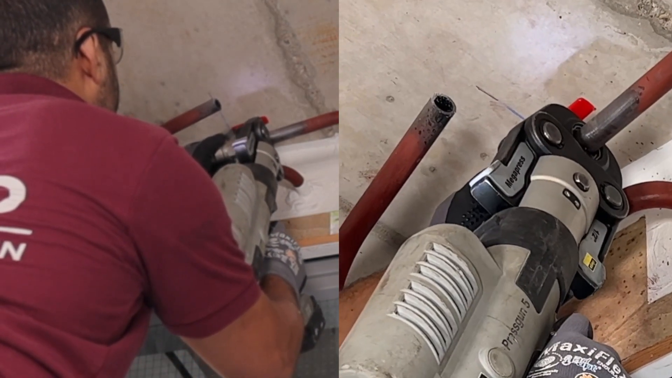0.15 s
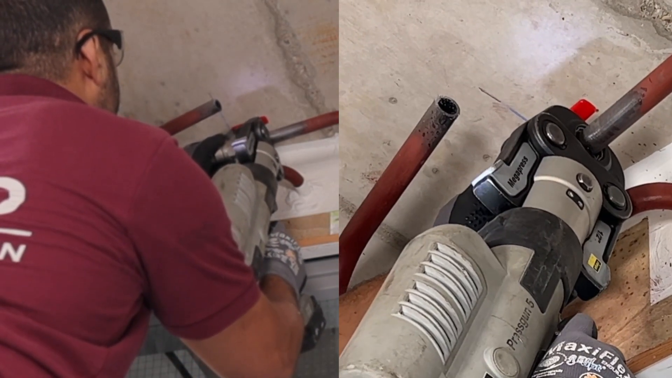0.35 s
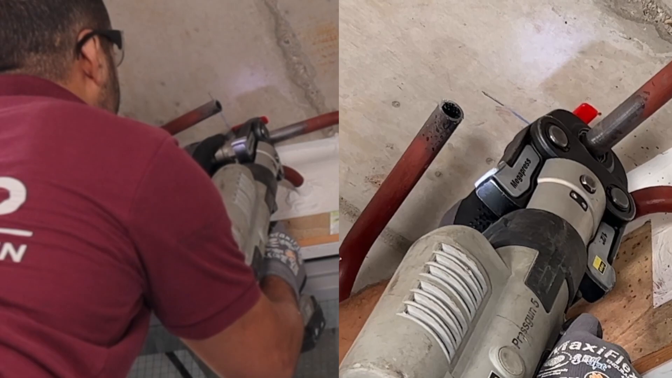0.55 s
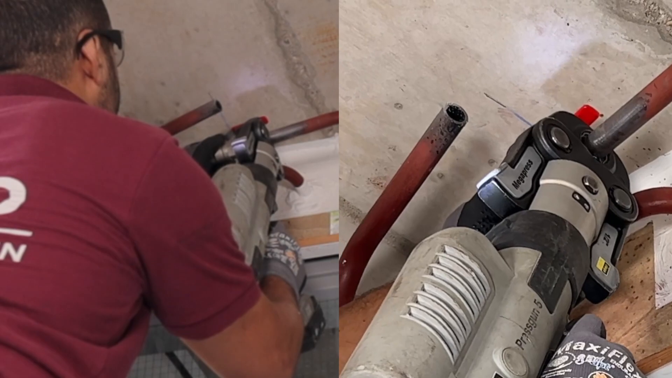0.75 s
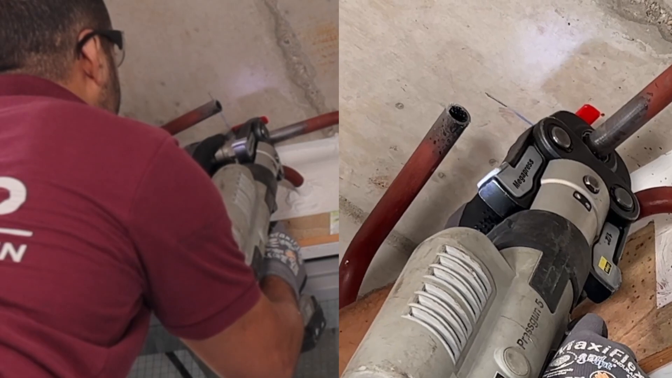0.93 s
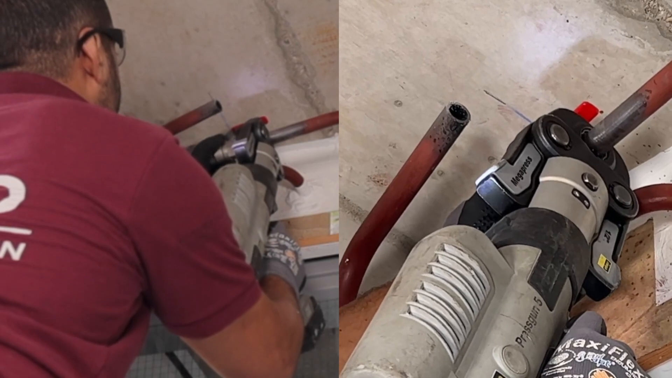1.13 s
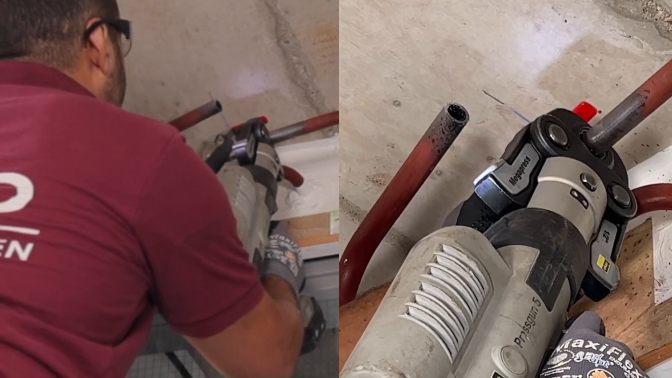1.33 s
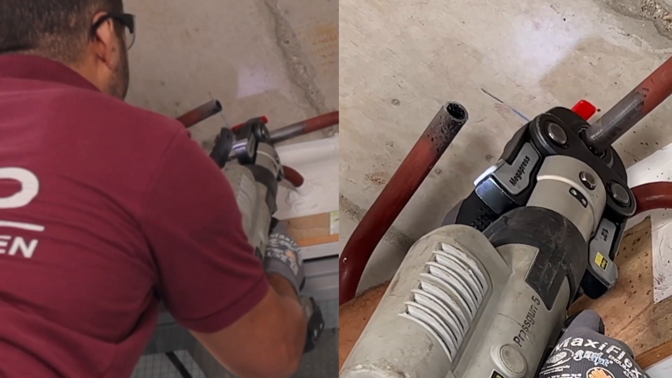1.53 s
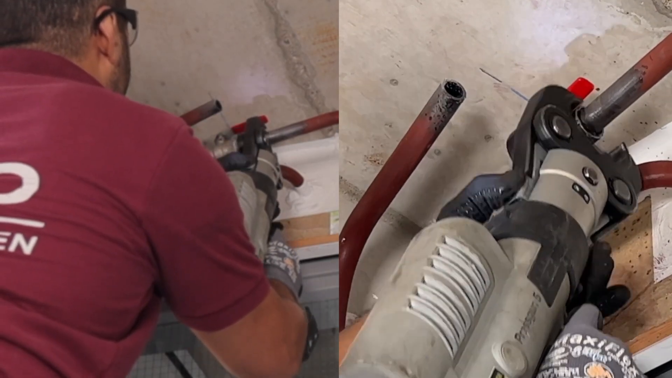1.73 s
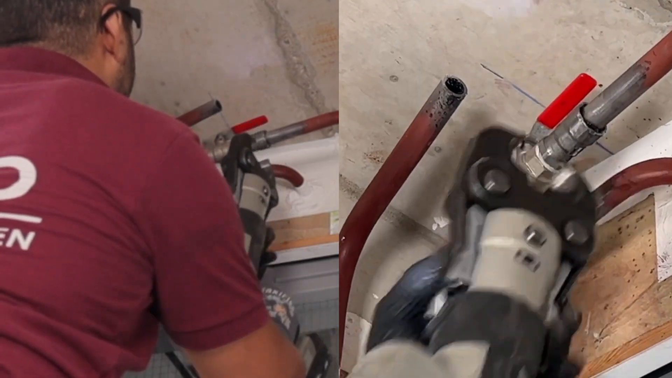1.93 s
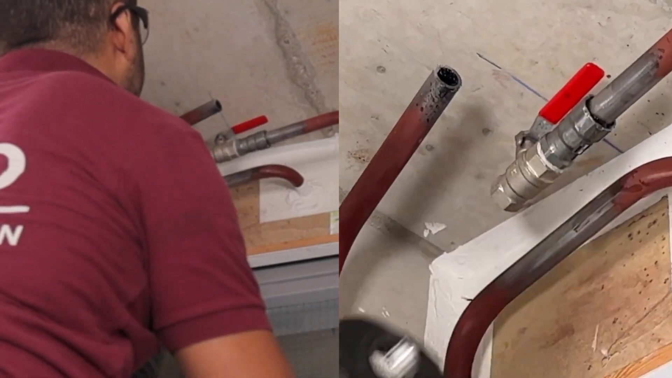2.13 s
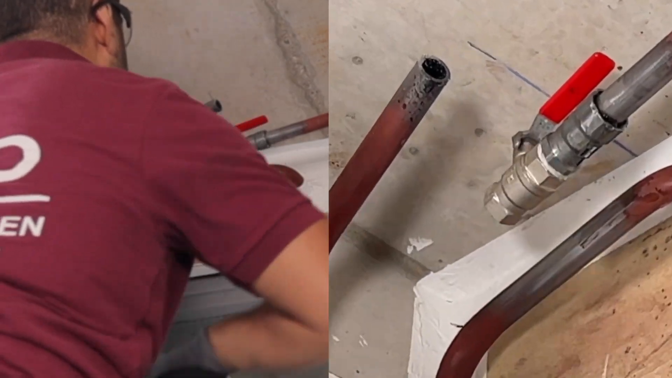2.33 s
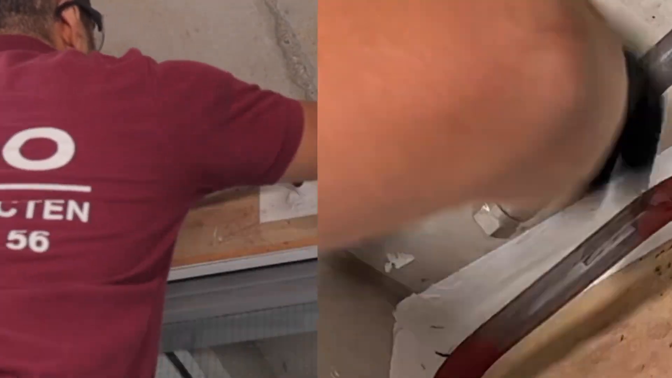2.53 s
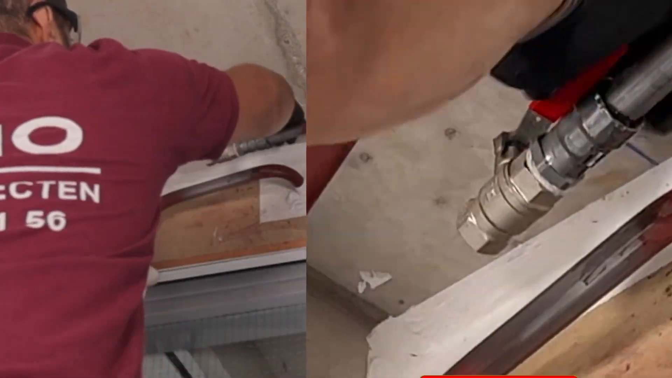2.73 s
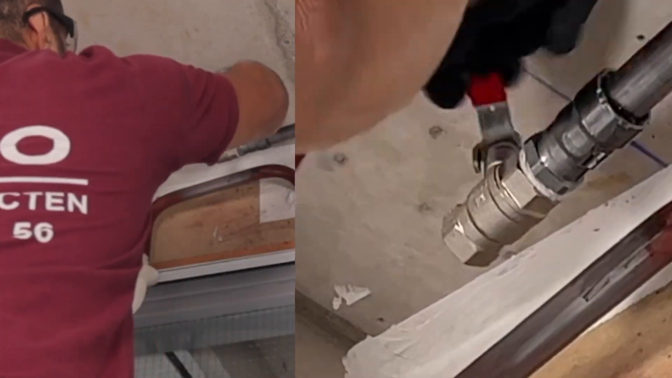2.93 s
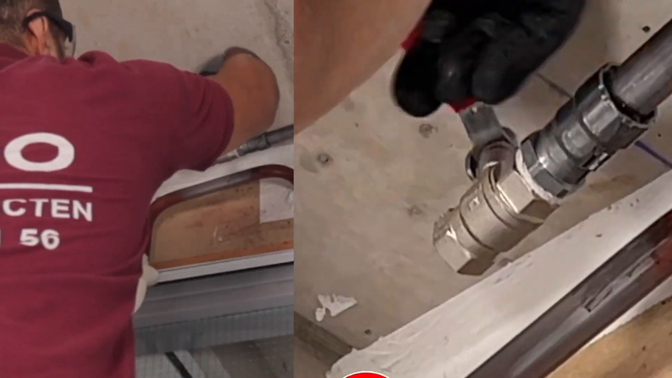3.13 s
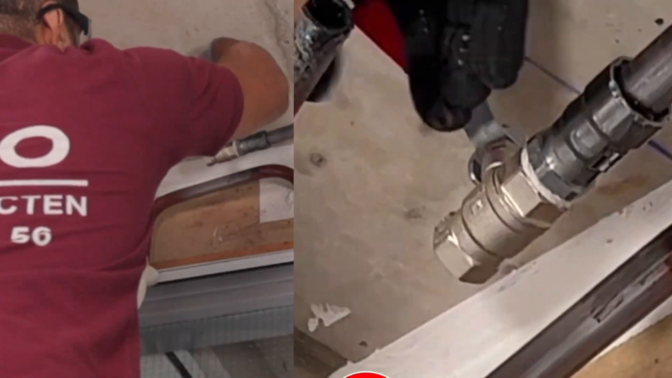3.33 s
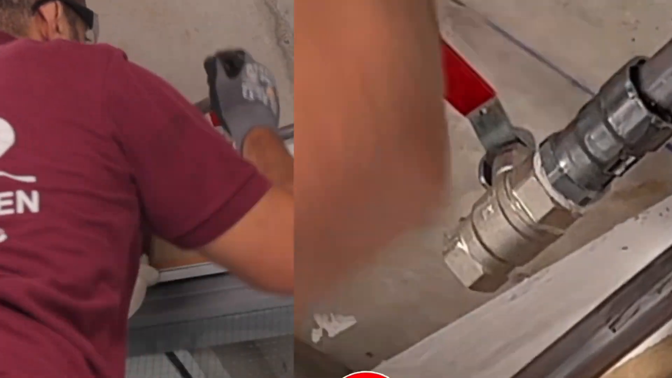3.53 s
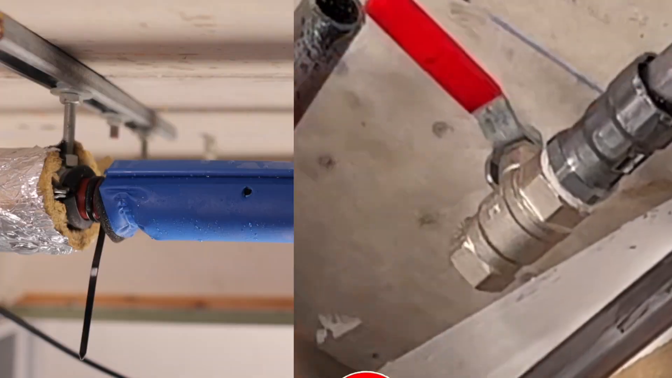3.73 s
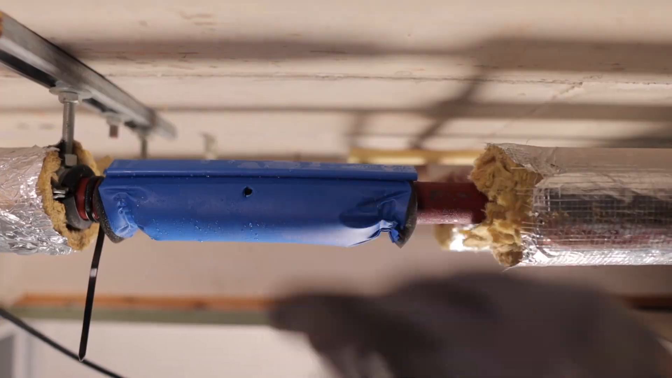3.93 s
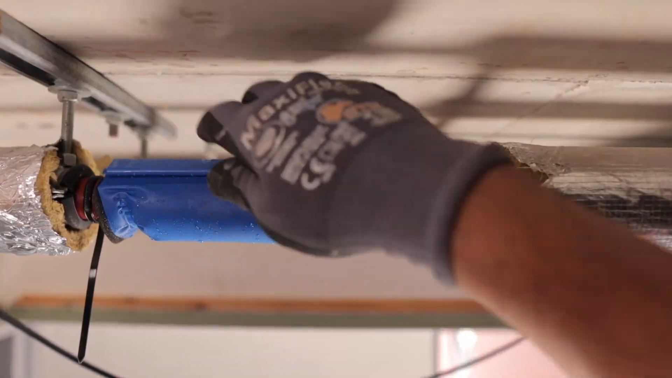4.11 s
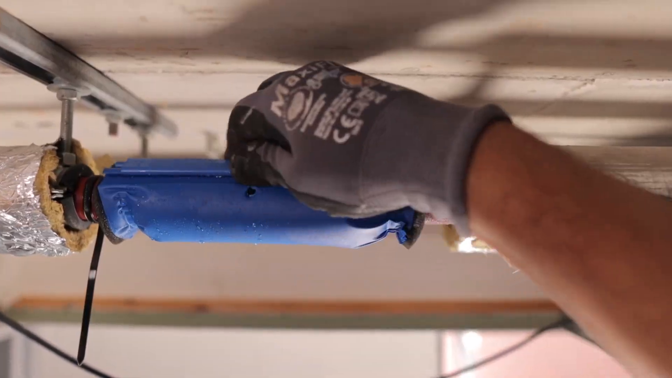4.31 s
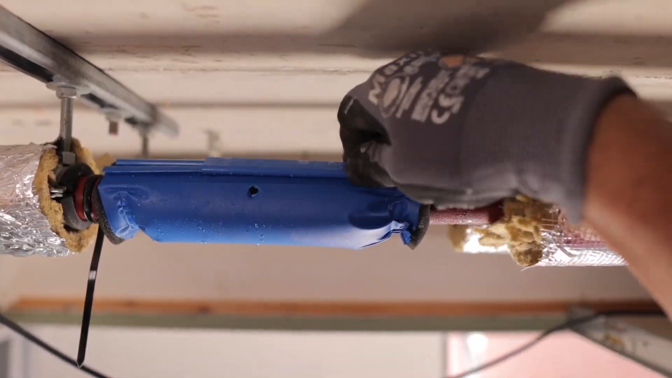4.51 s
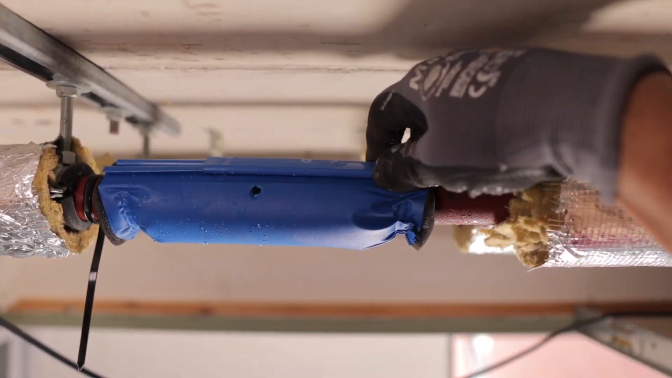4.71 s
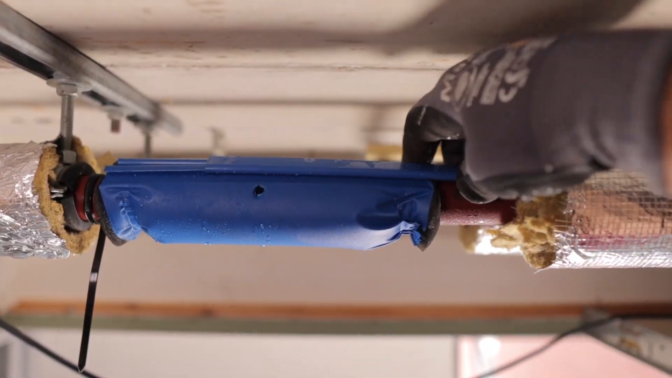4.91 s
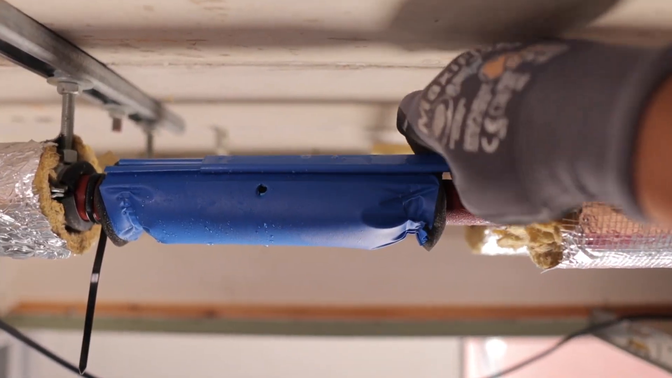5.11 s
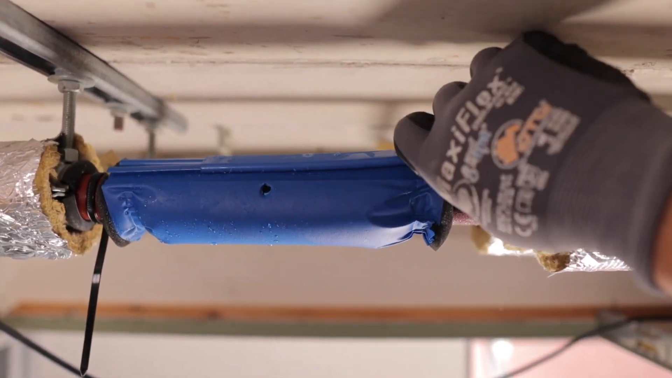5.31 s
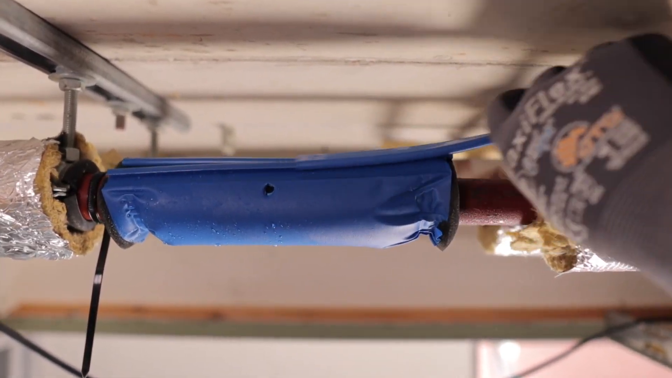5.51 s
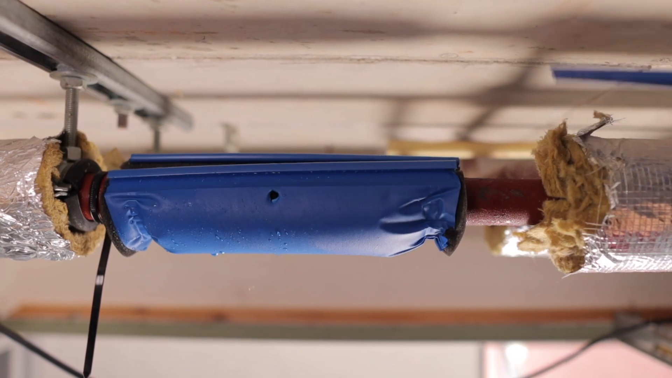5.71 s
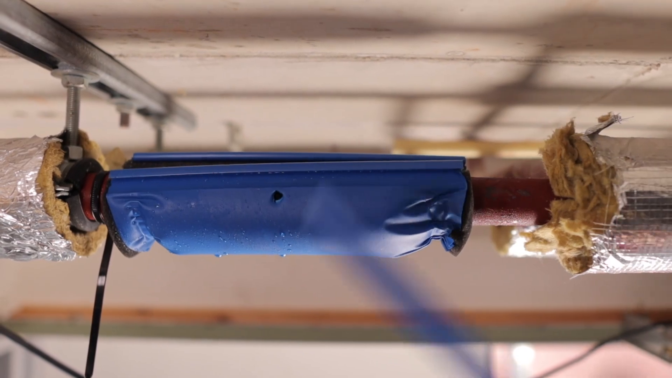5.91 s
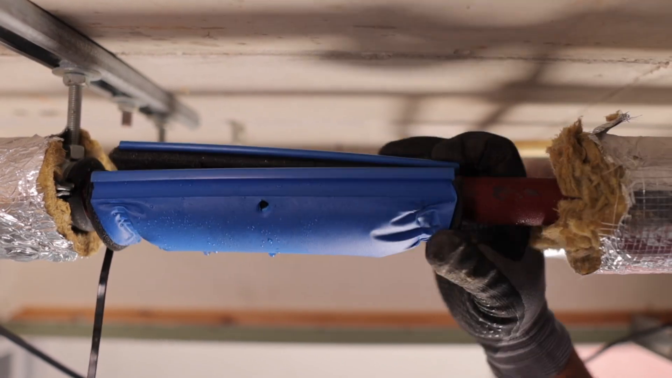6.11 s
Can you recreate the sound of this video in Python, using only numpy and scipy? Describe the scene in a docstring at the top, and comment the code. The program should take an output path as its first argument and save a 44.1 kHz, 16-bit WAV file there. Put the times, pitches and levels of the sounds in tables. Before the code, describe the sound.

A battery press tool whines and hammers rapidly, sagging under load, pops and stops; metal jaws clank, a valve scrapes, then plastic ticks and rasps quietly.

```python
"""A piston pump knocks and whines as a battery press tool crimps a fitting on a steel pipe, slowing under load.
The relief valve pops; sprung steel jaws snap open and clank shut in a bare room; a glove turns a ball valve.
In a second scene, a near microphone (right) and a distant one (left) hear a glove pull a plastic strip along
a pipe sleeve. Damped modes give the ringing, filtered noise the friction, and phase-locked sines the gears."""
import sys
import numpy as np
from scipy import signal
from scipy.fft import rfft, irfft
from scipy.io import wavfile

SR = 44100
rng = np.random.default_rng(int(sys.argv[2]) if len(sys.argv) > 2 else 0)


def to_wav(s):
    """Save 16-bit WAV."""
    ch = np.atleast_2d(s).T  # columns
    pcm = np.round(np.clip(ch, -1, 1) * 32767)  # PCM
    wavfile.write(sys.argv[1], SR, pcm.astype(np.int16))


N = 271656
T = np.arange(N) / SR

# Pump speed under load, then free running and braking: [t/s, stroke rate f/Hz]
LOADED_SPEED = [(0.0, 63.15), (0.206, 64.18), (0.334, 63.75), (0.598, 61.82), (0.714, 60.1), (0.826, 56.81),
                (0.906, 55.1), (0.996, 52.2), (1.02, 52.4)]
FREE_SPEED = [(1.045, 56.5), (1.092, 65), (1.11, 57), (1.18, 20)]
# Resonances of the tool's shell: [f/Hz, width/Hz, level/dB]
SHELL_MODES = [(727, 29, -0.5), (1062, 59, 7), (1940, 240, -10), (2276, 110, 1), (2565, 7, 4),
               (2940, 110, -0.5), (3720, 54, -7), (5400, 400, 0.5)]
# The shell's response to the overtones of cam and gears: [f/Hz, level/dB]
SHELL_RESPONSE = [(64, -22), (128, -35), (192, -35.5), (260, -16), (380, -20.5), (450, -17.5), (510, -19.5),
                  (580, -5), (700, -5), (765, 1), (830, -24.5), (900, -22.5), (960, -4.5), (1085, -3),
                  (1160, -21), (1470, -11.5), (1720, -11.5), (1990, 0.5), (2110, -8), (2230, -4.5),
                  (2400, -20.5), (2600, -2), (2750, -19)]
# A narrow gearbox resonance: [f/Hz, width/Hz]
GEARBOX_RESONANCE = (3700, 70)
# The two strong gearbox overtones: [multiple of the stroke rate]
STRONG_ORDERS = (59, 60)
# Relative noise spectra of gears, piston knock and returning oil: [f/Hz, level/dB per Hz]
GEAR_SPECTRUM = [(59, -56.5), (100, -38.5), (277, -26.5), (308, -15), (350, -22.5), (433, -7.5),
                 (752, -1.5), (872, -12), (1060, -5.5), (1280, -9), (2000, -13.5), (4670, -8), (5650, -7),
                 (12400, -23), (16000, -39.5)]
PISTON_SPECTRUM = [(100, -56.5), (200, -32), (280, -14), (460, -3.5), (600, -12), (760, 1), (900, -10.5),
                   (1080, -3.5), (1300, -6.5), (1900, 1), (3000, -4.5), (4300, -15), (6000, -17),
                   (8000, -25.5), (12700, -28.5), (16000, -35)]
OIL_SPECTRUM = [(88, -57.5), (150, -34.5), (475, -11), (649, -13), (730, 5.5), (923, -9), (1830, -6),
                (3200, -11.5), (4490, -17), (5570, -16.5), (12400, -30), (16000, -45)]
# Components of the relief valve's pop: [f/Hz, level/dB, t60/s]
RELIEF_MODES = [(450, -4, 0.15), (1440, -3, 0.033)]
# Modes of the steel jaws: [f/Hz, relative level/dB snapped open, relative level/dB clanking shut, t60/s]
STEEL_MODES = [(720, -6, -28.5, 0.024), (3300, -13.5, -20.5, 0.015), (5000, -9, -18, .015),
               (6060, 3.5, -11.5, 0.018), (6640, -16, -11, .025), (6850, -8.5, -23.5, 0.028),
               (8270, -20, 2.5, 0.042), (12900, -9, -25, 0.02), (13900, -15, 4, 0.076)]
# Blows on the jaws: [t/s, relative level/dB, closure 0-1, treble tilt/dB per octave, crack t60/s]
BLOWS = [(1.8619, -6.5, 0.1, 3.5, 0.064), (1.8631, -0.5, 0.08, -2, 0.019), (2.11, 3, 0.8, -4, 0.0078),
         (2.13, -1, 0.98, -2.5, 0.011), (2.1402, -15.5, 1, -9.5, 0.026), (2.145, -14.5, 0.2, 2.5, 0.078)]
# Relative spectra of jaw crack, pin rattle and dragged tool: [f/Hz, level/dB per Hz]
CRACK_SPECTRUM = [(59, -62.5), (100, -23.5), (736, -8.5), (2370, -0.5), (2930, -5), (3540, -3.5),
                  (5300, -7), (6290, -1.5), (9410, -13), (14100, -10), (16000, -21.5)]
RATTLE_SPECTRUM = [(100, -28), (400, -13), (800, -9.5), (1500, 6.5), (2800, -7.5), (3600, -2.5),
                   (6500, -5.5), (10000, -17.5), (16000, -20)]
DRAG_SPECTRUM = [(30, -16.5), (55, -11.5), (70, 2), (90, -12), (130, -20.5), (250, -34), (2000, -70.5)]
# Knocks of tool and valve handle: [t/s, peak level/dB, centre f/Hz, t60/s, width/octaves]
HANDLE_KNOCKS = [(1.311, -32, 679, 0.067, 0.46), (1.49, -25.5, 5050, 0.035, 0.35),
                 (1.812, -32.5, 693, 0.06, 1.3), (1.819, -20, 860, 0.12, 1.65),
                 (1.824, -25.5, 730, 0.035, 1.3), (1.885, -17.5, 1626, 0.11, 2.3),
                 (1.899, -16.5, 700, 0.11, 1.7), (2.091, -33, 875, 0.068, 1.13),
                 (2.34, -31, 900, 0.058, 1.76), (2.365, -31, 684, 0.087, 0.89),
                 (2.469, -26, 713, 0.083, 0.5)]
# Modes of the valve body and its pipe: [f/Hz, relative level/dB, t60/s]
BODY_MODES = [(130, 0, 0.1), (609, -3.5, 0.072), (737, 3, 0.051), (934, -1, 0.045), (1482, -0.5, 0.063),
              (1603, -3.5, 0.047), (1820, -6.5, 0.087), (2550, -7.5, 0.043)]
# Glove bumps on the valve handle: [t/s, relative level/dB, hold/s, release/s]
HANDLE_BUMPS = [(3.094, -35.5, .11, 0.24), (3.46, -40, .016, 0.068), (3.804, -44, 0.0072, .02)]
# Pushes that turn the ball in its seat: [t/s, relative starting level/dB, hold/s, release/s]
BALL_PUSHES = [(3.039, -44, 0.038, 0.34), (3.439, -49.5, .3, 0.048)]
# Relative spectra of gripping glove, scraping ball and rubbing strip: [f/Hz, level/dB per Hz]
GRIP_SPECTRUM = [(18, -25.5), (30, 7.5), (122, 5), (165, 1.5), (246, 1.5), (473, -1), (578, -22), (724, -1),
                 (863, -18), (1100, -11), (2000, -30), (12000, -42), (15600, -76.5), (22000, -120)]
SCRAPE_SPECTRUM = [(47, -35), (80, -9), (124, -10), (205, -16), (379, -7), (526, -10), (747, -10.5),
                   (1260, -15.5), (1790, -15.5), (2040, -19.5), (3310, -22.5), (5020, -25), (15000, -44)]
STRIP_SPECTRUM = [(88, -83), (150, -12), (286, -13.5), (475, 2), (524, -8.5), (612, 0.5), (960, -5),
                  (1080, -2.5), (1700, -2), (2800, -11), (6200, -12), (8500, -24), (12700, -23),
                  (16000, -29)]
# Tugs on the strip, where friction builds up and lets go: [peak t/s, relative level/dB, build-up/s]
STRIP_TUGS = [(4.161, -42.5, 0.0084), (4.275, -44.5, 0.031), (4.44, -49.5, 0.32), (4.591, -47.5, 0.11),
              (4.95, -49, 0.043), (5.015, -46, .05), (5.07, -49, 0.022), (5.185, -38, 0.019),
              (5.348, -33.5, 0.024), (5.669, -45.5, .09), (5.745, -35, 0.084), (5.852, -41.5, 0.033),
              (6.03, -44, .028)]
# Ticks and thuds of strip and sleeve: [t/s, relative peak level/dB, centre f/Hz, t60/s, width/octaves]
STRIP_TICKS = [(3.826, -19, 2800, 0.043, 0.66), (3.916, -23, 3340, 0.097, 1.05),
               (4.157, -28, 1178, 0.089, 0.09), (4.237, -14.5, 3530, 0.14, 0.87),
               (4.24, -22, 5040, 0.25, 0.2), (4.403, -17.5, 2270, 0.02, 1.46),
               (4.453, -13.5, 2300, 0.032, 1.45), (4.515, -32, 1376, 0.056, 0.24),
               (4.584, -34, 1560, .06, 0.43), (4.681, -24, 4330, 0.044, 1.4),
               (4.833, -32.5, 4000, 0.022, 0.92), (4.851, -23, 4340, 0.015, 0.86),
               (5.173, -24, 900, 0.076, 3.1), (5.195, -15.5, 5450, 0.044, 0.87),
               (5.322, -21, 1790, 0.043, 2.4), (5.337, -29, 446, .06, 0.76), (5.35, -17, 3500, 0.051, 1.03),
               (5.351, -20.5, 640, 0.055, 1.4), (5.738, -23.5, 1720, 0.09, 0.24),
               (5.751, -18, 2000, 0.04, 1.7), (5.874, -22, 4000, 0.011, 1.1), (5.935, -39, 5740, .17, 0.07),
               (6.025, -22.5, 2210, 0.13, 2.44)]
# Reverberation time: [f/Hz, t60/s]
REVERB_T60 = [(100, 1), (700, 1), (2000, 0.98), (5000, 1), (8200, 0.91), (14000, .45)]
# Relative colour of the reverberation: [f/Hz, level/dB]
REVERB_COLOUR = [(100, 2.5), (700, -4), (2000, -1.5), (6000, 5), (9000, 0), (15000, 0.5)]
# Relative spectra of the background in the two scenes: [f/Hz, level/dB per Hz]
ROOM_SPECTRUM = [(15, -39), (25, -5.5), (76, 4), (161, -8.5), (212, -11.5), (476, -10.5), (659, -12),
                 (1020, -18.5), (1190, -16.5), (12900, -35), (16000, -45.5)]
HISS_SPECTRUM = [(15, -49), (25, 7), (70, 5.5), (293, -7.5), (489, -5.5), (1230, -10), (3160, -20.5),
                 (5880, -18.5), (7920, -19), (14400, -19), (16000, -23)]

# The motor sags as the oil pressure (0-1) grows: speed at light load, pressure there, gain per Hz lost
LIGHT_LOAD_HZ, LIGHT_PRESSURE, PRESSURE_PER_HZ = 62.66, 0.14, 0.07
# Pump gain without pressure, its change at full pressure, and the gain running free with the valve open
PUMP_DB, PUMP_STRAIN_DB, PUMP_FREE_DB = -16.5, -4.5, -27.5
# Gains of gear tones and noise, their changes at full pressure, and the shell buzz
TONES_DB, TONES_STRAIN_DB, MESH_DB, MESH_STRAIN_DB, BUZZ_DB = -1, -6, -7, -1, -23
# The valve opens; the motor cuts out and brakes (attack and release times cover 20 dB throughout)
RELIEF_S, MOTOR_OFF_S, BRAKE_S = 1.0198, 1.11, 0.057
# The pinion's whine, as a multiple of the stroke rate, is loudest at a resonance of the shell
WHINE_ORDER, WHINE_DB, WHINE_PEAK_HZ, WHINE_WIDTH_HZ = 90, -30, 5400, 610
GEARBOX_STRONG_DB, GEARBOX_WEAK_DB = -27, -40
# Oil rushes back from the valve's pop until the motor stops
OIL_DB, OIL_RELEASE_S = -25.5, 0.04
# The tool is dragged off the pipe between the opening and the shutting of its jaws
DRAG_S, DRAG_HOLD_S, DRAG_FADE_S, DRAG_DB = 1.93, 0.13, 0.098, -43.5
# The scrape grows while the ball moves
BUMP_ATTACK_S, PUSH_ATTACK_S, PUSH_GROWTH_DB_PER_S = 0.023, 0.015, 36.5
# The stiff ball breaks free in jerks, each gap a share of the one before
JERK_S, JERK_GAP_S, JERK_GAP_SHARE, JERK_DB = 3.433, .013, .92, -35.5
TUG_RELEASE_S = 0.043
# Between tugs the glove rests on the sleeve and rubs faintly
TOUCH_S, TOUCH_DB, TOUCH_WAVER_DB = 4.15, -58, -1
# Faint fingertip ticks on the sleeve: mean relative level, middle pitch, decay and width
FAINT_TICK_DB, FAINT_TICK_HZ, FAINT_TICK_T60_S, FAINT_TICK_OCTAVES = -39.5, 1660, 0.012, 1.07
SECOND_SCENE_S = 3.81
TOP_HZ = 15700


def press_tool():
    """Load-dependent excitation: gear sound gives way to piston knocks with pressure; then oil rushes back."""
    speed = curve(list(LOADED_SPEED) + FREE_SPEED)
    turns = np.cumsum(speed) / SR
    loaded = envelope(0, 1, RELIEF_S, release_s=0.0089)
    running = envelope(0, 1, MOTOR_OFF_S, BRAKE_S)
    pressure = loaded * np.clip(LIGHT_PRESSURE + PRESSURE_PER_HZ * (LIGHT_LOAD_HZ - speed), 0, 1)
    level_db = loaded * PUMP_DB + (1 - loaded) * PUMP_FREE_DB + PUMP_STRAIN_DB * pressure
    level = running * undb(level_db)
    shaft = turns + .0006 * walk(50)  # play in the gear train
    tones = gear_tones(shaft, speed)
    # the noise swells twice a stroke
    mesh_noise = rng.standard_normal(N) * undb(0.5 * np.cos(4 * np.pi * (turns - .25)))
    mesh = housing(colour(mesh_noise, GEAR_SPECTRUM), ring_db=-3.5)
    gears = undb(TONES_DB + TONES_STRAIN_DB * pressure) * tones
    gears = gears + undb(MESH_DB + MESH_STRAIN_DB * pressure) * mesh + undb(BUZZ_DB) * shell_buzz(shaft)
    knocks = undb(-11 + 10.5 * pressure) * piston(turns, pressure)
    oil_flow = undb(OIL_DB) * envelope(RELIEF_S, .004, MOTOR_OFF_S - RELIEF_S, OIL_RELEASE_S)
    oil = colour(rng.standard_normal(N), OIL_SPECTRUM) * oil_flow
    return level * (gears + knocks) + whine(turns, running) + gearbox(shaft, loaded) + oil


def piston(turns, pressure, t60=0.028, loose=0.54, return_db=-2):
    """Periodic impact: a knock at the push and one at the return, which comes later as pressure grows."""
    out = np.zeros(N)
    for phase, db in ((.135, 0), (.67 + .055 * pressure, return_db)):
        knock = burst(t60)
        strokes = np.flatnonzero(np.diff(np.floor(turns - phase)) > 0)
        scatter = rng.standard_normal((80, 2)) * [.00004, 1.1]  # lateness/s, level/dB
        for i, (late_s, size_db) in zip(strokes, scatter):
            add(out, T[i] + late_s, undb(db + size_db) * (knock + loose * burst(t60)))
    return colour(out, PISTON_SPECTRUM)


def gear_tones(shaft, speed, count=46):
    """Harmonic series: each overtone takes its level from the shell's response and wavers on its own."""
    tones = 0
    for k in range(1, count + 1):
        level = undb(on_log(k * speed, SHELL_RESPONSE) + 1.5 * walk(8.8))
        tones = tones + level * np.sin(2 * np.pi * (k * shaft + rng.random()))
    return tones / np.std(tones[T < RELIEF_S])


def housing(x, ring_db):
    """Forced resonance: the shell lifts its own modes out of whatever shakes it."""
    def gain_db(f):
        peaks = sum(undb(db) / (1 + (2 * (f - hz) / width) ** 2) for hz, width, db in SHELL_MODES)
        return 20 * np.log10(1 + undb(ring_db) * peaks)
    return unit(shape(x, gain_db))


def shell_buzz(shaft):
    """Periodic impulse response: each cam turn rings the shell; overtones flare as they cross a resonance."""
    t = T[:SR // 4]
    shell = 0
    for hz, width, db in SHELL_MODES:
        decay = np.exp(-np.pi * width * t)
        shell = shell + undb(db) * np.sqrt(width) * decay * np.sin(2 * np.pi * hz * t)
    cam = np.diff(np.floor(shaft - .135), prepend=-1.) * (T < RELIEF_S)
    return unit(signal.fftconvolve(cam, shell)[:N])


def whine(turns, running):
    """Phase modulation: the pinion sings, and each stroke slows it briefly, setting side tones around it."""
    phase = 2 * np.pi * WHINE_ORDER * (turns + .0015 * walk(90)) + .9 * np.sin(2 * np.pi * turns)
    flutter = undb(2 * walk(200)) * (1 + .5 * np.cos(2 * np.pi * turns))
    hz = WHINE_ORDER * np.gradient(turns) * SR
    resonance = 1 / np.hypot(1, 2 * (hz - WHINE_PEAK_HZ) / WHINE_WIDTH_HZ)
    return unit(np.sin(phase) * flutter) * undb(WHINE_DB) * resonance * running


def gearbox(turns, loaded):
    """Selective resonance: under load, stroke overtones sing out as they near the gearbox resonance."""
    hz, width = GEARBOX_RESONANCE
    speed = np.gradient(turns) * SR
    song = 0
    for k in range(55, 74):
        gain = undb(GEARBOX_STRONG_DB if k in STRONG_ORDERS else GEARBOX_WEAK_DB)
        resonance = 1 / np.hypot(1, (2 * (k * speed - hz) / width) ** 2)
        song = song + gain * np.sin(2 * np.pi * k * turns) * resonance
    return song * loaded


def relief_valve(rise_s=0.0004):
    """Sudden discharge: the valve gives way and dumps the oil pressure in one pop of damped sines."""
    out, t = np.zeros(N), T[:SR // 4]
    pop = sum(undb(db) * fade(t60) * np.sin(2 * np.pi * hz * t) for hz, db, t60 in RELIEF_MODES)
    outflow = (1 - np.exp(-t / rise_s)) / (1 + (t / 0.0064) ** 12)  # over within a few cycles
    add(out, RELIEF_S, pop * outflow)
    return out


def jaws():
    """Impact of steel on steel: a crack, ringing modes and rattling pins; the tool rumbles off the pipe."""
    drag = undb(DRAG_DB) * envelope(DRAG_S, DRAG_FADE_S, DRAG_HOLD_S, DRAG_FADE_S)
    out = colour(rng.standard_normal(N), DRAG_SPECTRUM) * drag
    for s, db, shut, tilt, t60 in BLOWS:
        modes = []
        for hz, open_db, shut_db, decay in STEEL_MODES:
            mode_db = np.interp(shut, (0, 1), (open_db, shut_db)) + tilt * np.log2(hz / 6000)
            modes.append((hz, mode_db, decay))
        crack = colour(burst(t60), CRACK_SPECTRUM)
        rattle = colour(burst(.06), RATTLE_SPECTRUM)
        blow = undb(-4.5) * ring(modes, split=0.0031) + undb(-23.5) * crack
        add(out, s, undb(db) * (blow + undb(-36 + 7.9 * shut) * rattle))
    return out


def ball_valve(count=7):
    """Stick-slip: the hand shakes the pipe dully; the ball jerks free, then scrapes and rings the body."""
    grip = sum(undb(db) * envelope(s, BUMP_ATTACK_S, hold, release) for s, db, hold, release in HANDLE_BUMPS)
    turn = 0
    for s, db, hold, release in BALL_PUSHES:
        growing = undb(db + PUSH_GROWTH_DB_PER_S * np.clip(T - s, 0, hold))
        turn = turn + growing * envelope(s, PUSH_ATTACK_S, hold, release)
    bumps = colour(grains(2.1), GRIP_SPECTRUM) * grip * undb(1.2 * walk(32))
    slips = grains(2.3) * undb(0.87 * walk(90))
    scrape = colour(slips, SCRAPE_SPECTRUM)
    body = unit(signal.fftconvolve(slips, ring(BODY_MODES, split=0.0454))[:N])
    out = undb(-2.0) * bumps + (undb(0.5) * scrape + undb(-5.5) * body) * turn
    for k in range(count):
        s = JERK_S + JERK_GAP_S * np.sum(JERK_GAP_SHARE ** np.arange(k))
        add(out, s, undb(JERK_DB) * (ring(BODY_MODES, split=0.036) + undb(-27) * burst(0.0037)))
    return out


def plastic_strip():
    """Dry friction: the strip rasps in small slips; where it catches it ticks and the hollow sleeve thuds."""
    tugs = sum(undb(db) * envelope(s, build, 0, TUG_RELEASE_S) for s, db, build in STRIP_TUGS)
    touch = undb(TOUCH_DB + TOUCH_WAVER_DB * walk(30)) * (T > TOUCH_S)
    rub = colour(grains(4.2), STRIP_SPECTRUM)  # dense slips of the strip's edge
    rasp = rub * np.hypot(tugs, touch) * undb(2.26 * walk(150))
    return undb(4.5) * rasp + undb(1.0) * taps(STRIP_TICKS + faint_ticks(), skirt_db=-18)


def faint_ticks(count=26):
    """Random contact: rows for taps, small catches of the glove scattered in time, level and pitch."""
    rows = []
    for when, size, pitch in rng.random((count, 3)):
        s = TOUCH_S + when * (T[-1] - TOUCH_S)
        db = FAINT_TICK_DB + 8 * (size - .5)
        hz = FAINT_TICK_HZ * 2 ** (pitch - .5)
        rows.append((s, db, hz, FAINT_TICK_T60_S, FAINT_TICK_OCTAVES))
    return rows


def taps(rows, skirt_db):
    """Damped impact: short contacts, each a noise burst through a resonance of its own."""
    out = np.zeros(N)
    for s, db, centre, t60, width in rows:
        def hump_db(hz):
            peak = np.exp(-(np.log2((hz + 1) / centre) / width) ** 2)
            skirt = undb(skirt_db) * hz / (hz + 300) / (1 + hz / centre / 2)
            return 20 * np.log10(peak + skirt + 1e-4)
        contact = burst(t60) + undb(5.5) * burst(t60 / 5)  # the first contact is the hardest
        tap = shape(contact, hump_db)
        add(out, s, undb(db) * tap / np.abs(tap).max())
    return out


def room(x, build_s):
    """Diffuse reverberation: echoes of bare concrete build up over build_s and the treble dies first."""
    t = T[:SR]
    noise, hz, tail = rfft(rng.standard_normal(SR)), np.arange(SR // 2 + 1), 0
    for centre in 2. ** np.arange(6, 15):  # overlapping octave bands, centre f/Hz
        band = np.clip(1 - np.abs(np.log2((hz + 1) / centre)), 0, 1)
        decay = np.exp(-np.log(1000) * t / on_log(centre, REVERB_T60))
        tail = tail + irfft(noise * band) * undb(on_log(centre, REVERB_COLOUR)) * decay
    tail = tail * (1 - np.exp(-(t / build_s) ** 2))
    return signal.fftconvolve(x, tail / np.sqrt(np.sum(tail ** 2)))[:N]


def background(spectrum, db):
    """Stationary noise of air and microphone, its level wavering a little."""
    return colour(rng.standard_normal(N), spectrum) * undb(db + 0.26 * walk(2.1))


def ring(modes, split, count=7):
    """Modal decay: damped sines; loosely joined parts split each mode into close ones."""
    t = T[:SR // 4]
    out = 0
    for hz, db, t60 in modes:
        cluster = hz * (1 + split * rng.standard_normal((count, 1)))
        sines = np.sin(2 * np.pi * (cluster * t + rng.random((count, 1))))
        mode = fade(t60) * np.sum(sines, axis=0)
        # every cluster gets the energy of a single damped sine
        out = out + undb(db) * mode * np.sqrt(np.sum(fade(t60) ** 2) / np.sum(mode ** 2) / 2)
    return out


def grains(spread_db):
    """Granular friction: dense micro-slips of very unequal size."""
    sizes_db = spread_db * np.minimum(rng.exponential(size=N), 2 * np.pi)
    return unit(rng.standard_normal(N) * undb(sizes_db))


def burst(t60):
    """Transient noise: a random signal that dies away exponentially."""
    return fade(t60) * rng.standard_normal(SR // 4)


def fade(t60):
    """Exponential damping over a quarter second, falling 60 dB in each t60."""
    return np.exp(-np.log(1000) * T[:SR // 4] / max(t60, 1 / SR))


def envelope(s, attack_s, hold_s, release_s):
    """Exponential rise to full level at s, hold, then fall; attack and release each cover 20 dB."""
    away = np.maximum(s - T, 0) / attack_s + np.maximum(T - s - hold_s, 0) / release_s
    return 10 ** -np.minimum(away, 10)


def walk(rate):
    """Random modulation: smooth chance with a spread near 1, from rate knots per second."""
    knots = rng.standard_normal(N // 10)
    return np.interp(T * rate, np.arange(len(knots)), knots) * np.sqrt(3 / 2)


def colour(x, spectrum):
    """Spectral shaping: filter x by (f/Hz, level/dB) points, at an rms of 1."""
    return unit(shape(x, lambda hz: on_log(hz, spectrum)))


def shape(x, gain_db):
    """Minimum-phase filtering: a causal filter with the gain gain_db(f/Hz), made from the cepstrum."""
    size = 4096
    cepstrum = irfft(gain_db(np.arange(size // 2 + 1) * SR / size) * np.log(10) / 20)
    # fold the cepstrum onto positive time
    cepstrum[1:size // 2] *= 2
    cepstrum[size // 2 + 1:] = 0
    return signal.fftconvolve(x, irfft(np.exp(rfft(cepstrum))))[:len(x)]


def on_log(hz, points):
    """Logarithmic interpolation: read (f/Hz, value) points on a log-frequency axis."""
    f, value = np.transpose(points)
    return np.interp(np.log(hz + 1), np.log(f), value)


def curve(rows):
    """Linear interpolation of (t/s, value) rows in time."""
    return np.interp(T, *np.transpose(rows))


def add(track, s, sound):
    """Superposition: mix a sound into a track at time s."""
    i = max(int(s * SR), 0)
    track[i:i + len(sound)] += sound[:N - i]


def unit(x):
    """Normalisation to an rms of 1."""
    return x / np.sqrt(np.mean(x ** 2))


def undb(db):
    """Level to amplitude: decibels to gain."""
    return 10 ** (np.asarray(db) / 20)


def scene():
    """Superposition of direct and diffuse sound: pressing in the centre, then the strip mostly on the right."""
    tool = press_tool()
    work = jaws() + taps(HANDLE_KNOCKS, skirt_db=-6) + ball_valve() + relief_valve()
    echoes = room(undb(-22.5) * tool + undb(-22.5) * work, build_s=0.045)
    pressing = tool + work + echoes + background(ROOM_SPECTRUM, -54.5)
    strip = plastic_strip()
    far = undb(-24) * strip + undb(-40.0) * room(strip, build_s=0.0056) + background(HISS_SPECTRUM, -57.5)
    near = strip + undb(-18.5) * room(strip, build_s=0.0033) + background(HISS_SPECTRUM, -58)
    return np.where(T < SECOND_SCENE_S, pressing, np.array([far, near]))  # left, right


def record(dry):
    """Saturation and band limiting: the recorder rounds off the loudest peaks and cuts the top."""
    rounded = dry / (1 + dry ** 4) ** (1 / 4)
    low_pass = signal.ellip(8, .2, 70, TOP_HZ, fs=SR, output="sos")  # ripple and stop band in dB
    return signal.sosfilt(low_pass, rounded)


dry = scene()
out = record(dry)
to_wav(out)
```